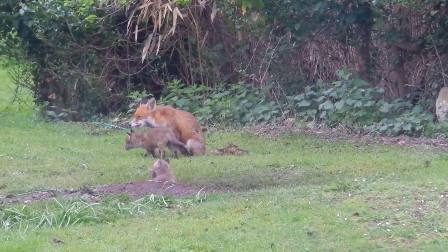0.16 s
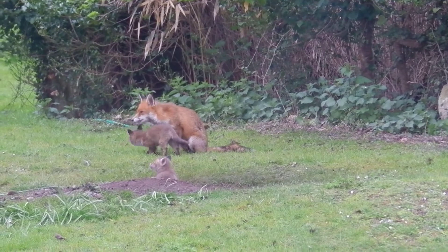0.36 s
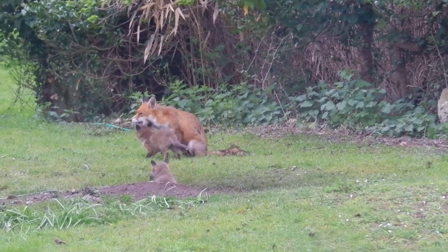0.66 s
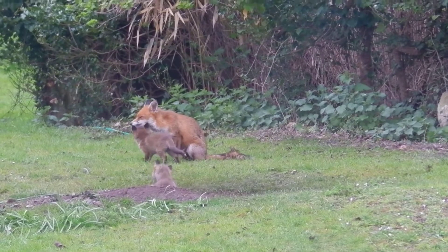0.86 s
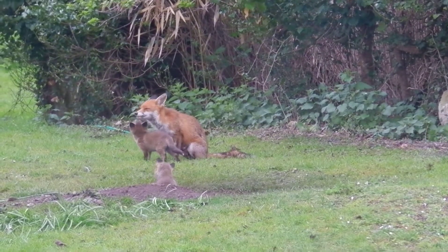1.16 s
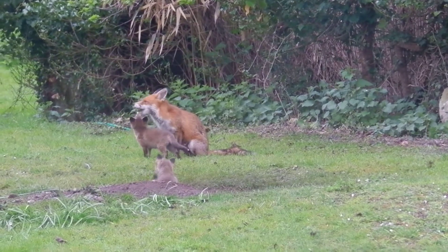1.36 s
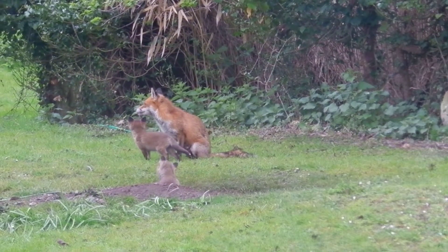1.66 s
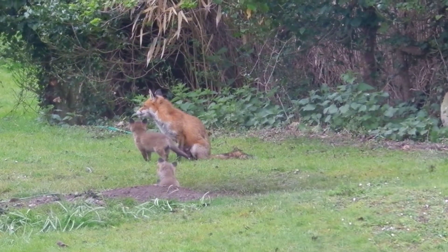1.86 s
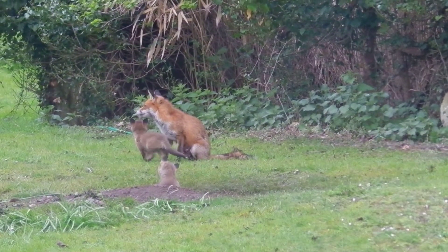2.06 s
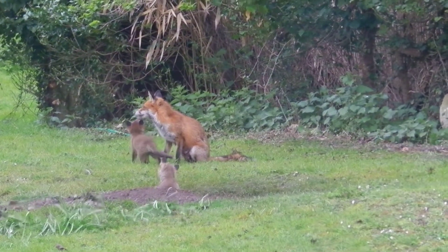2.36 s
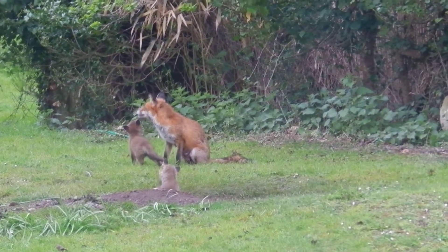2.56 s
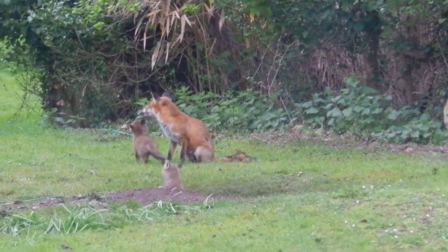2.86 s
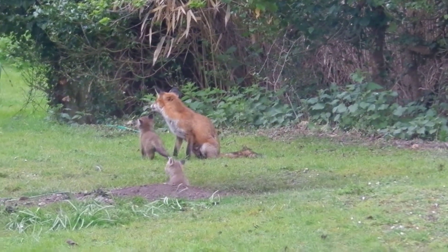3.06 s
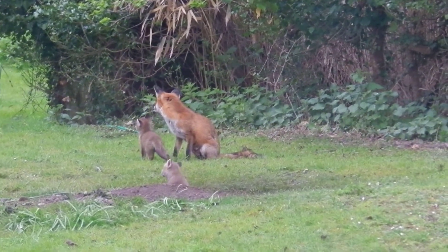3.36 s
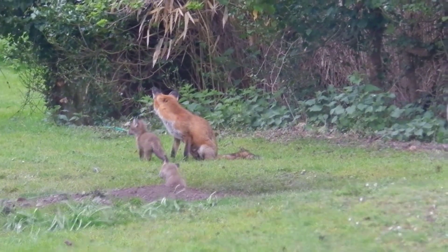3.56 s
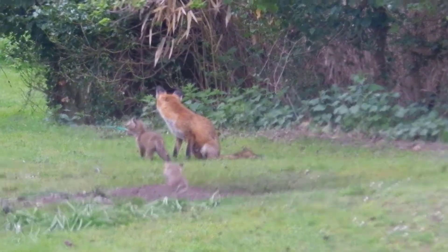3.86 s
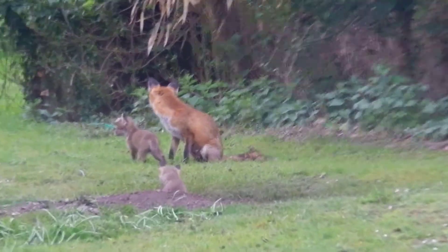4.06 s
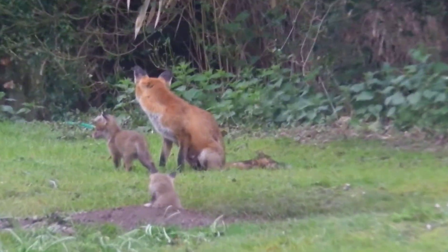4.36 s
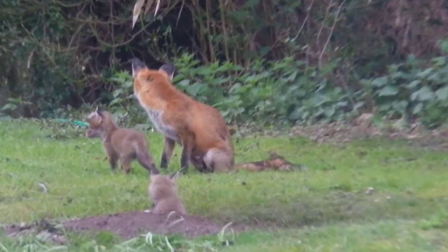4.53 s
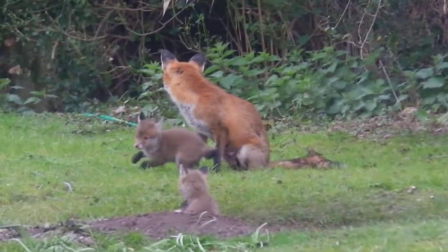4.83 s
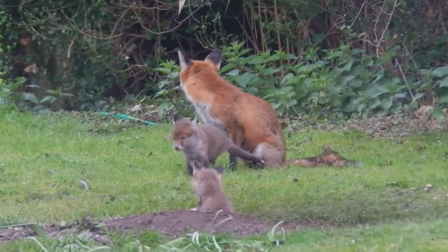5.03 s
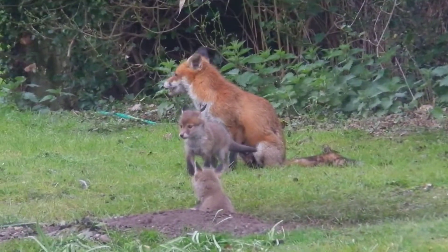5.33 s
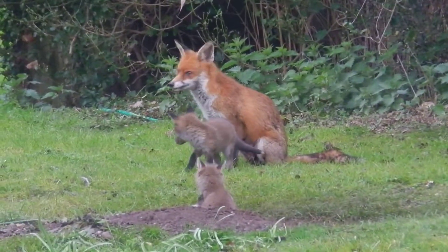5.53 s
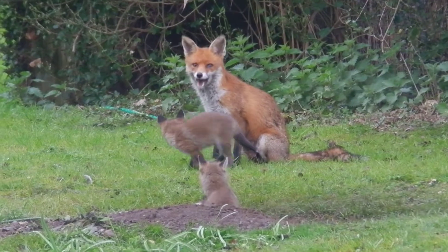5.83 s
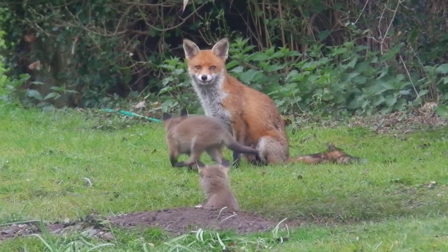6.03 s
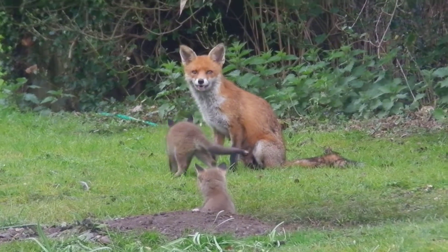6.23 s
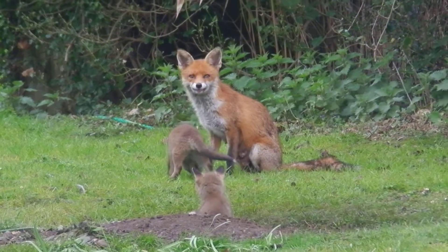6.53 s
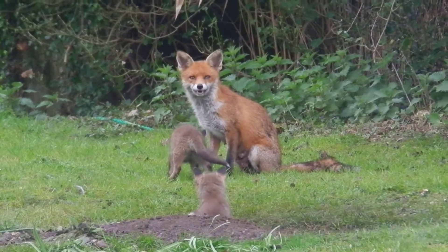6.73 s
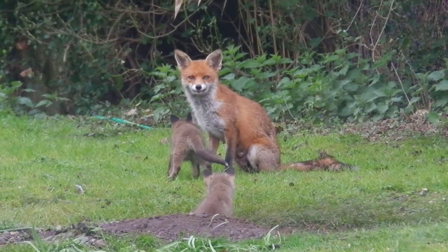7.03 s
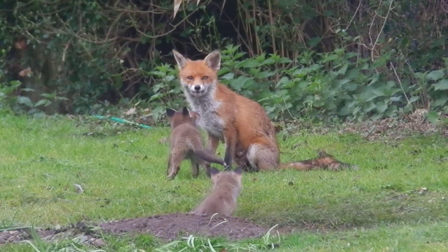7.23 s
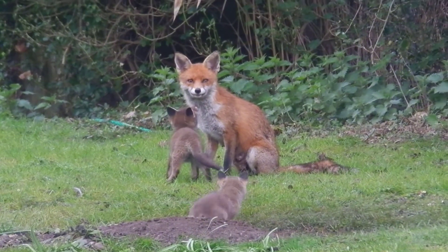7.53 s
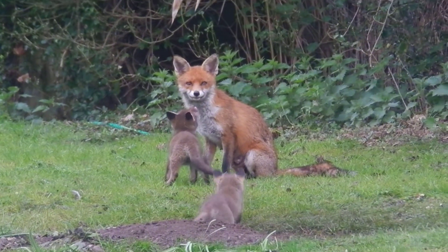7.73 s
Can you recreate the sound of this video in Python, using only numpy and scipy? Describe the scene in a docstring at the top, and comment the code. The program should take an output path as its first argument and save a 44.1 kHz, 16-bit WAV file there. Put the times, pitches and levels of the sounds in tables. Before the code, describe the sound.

Very close handling noise of a small camera in a quiet garden. Low rumble, soft hiss and a thin hum continue throughout. Faint finger rubs come first, then dull little motor bursts ten times a second, palm thuds and a hard knock. A brief whirring zoom with wavering chatter follows, starting near a sharp click, then another ticking train and near quiet. The foxes make no sound.

```python
"""Camcorder handling in a garden

A hand-held camcorder in a quiet garden hears mostly itself. The focus motor steps in bursts ten times a second
and shakes the resonant shell; the zoom gears whir for a moment as dense noise through the same shell, and a
loose part chatters in wavering tones. Fingers tick, thud and knock as decaying modes and slide as filtered
noise. Shaped noise makes the far rumble and microphone hiss, sines a thin hum and a faint falling bird chirp.
"""
import sys
import numpy as np
from scipy import signal
from scipy.fft import rfft, irfft
from scipy.io import wavfile
from scipy.ndimage import uniform_filter1d

SR = 44100
rng = np.random.default_rng(int(sys.argv[2]) if len(sys.argv) > 2 else 0)


def materialize(psi):
    """Save the field psi as 16-bit PCM at rate SR to the path in sys.argv[1].

    A 1-D psi becomes a single channel; in a 2-D psi each row is a channel.
    """
    bounded = np.clip(np.atleast_2d(psi).T, -1, 1)
    quanta = np.round(bounded * 32767).astype(np.int16)
    wavfile.write(sys.argv[1], SR, quanta)


N = 347831
T = np.arange(N) / SR  # time [s]
BLOW_T = T[:SR // 3]  # time within one touch [s]
OPPOSED = np.array([[1], [-1]])  # left and right capsule in opposite phase

# finger ticks: (time [s], peak [dB], crack against knock [dB], left minus right [dB], rattle against peak [dB])
TICK_EVENTS = [(0.281, -41, -24, 2, -16), (0.668, -39.5, 0, 4, -17), (0.69, -53, 17.5, 7, -18),
               (2.159, -29.5, -21.5, -2.5, -11.5), (2.165, -37, -8.5, -6.5, -7),
               (2.187, -33.5, -17, 7, -12), (2.819, -46, 2, -2, -10), (2.964, -45, -9, -0.5, -12),
               (3.26, -45, -5, 4, 2), (3.278, -30.5, -32, 3, -8), (3.375, -40, -9, 2, -4),
               (3.489, -26, -17.5, 3.5, -8), (3.611, -31.5, -22.5, -5, -8.5),
               (3.652, -38.5, -19, -1.5, -20), (3.723, -26.5, -21.5, -2.5, -14.5),
               (3.743, -40, -26, 0, -34), (4.18, -15, -7.5, 5, -17), (5.949, -47.5, -6, 1, -3),
               (6.778, -46.5, -10, 4, -12)]


def undb(db):
    """Gain of a level in dB."""
    return 10 ** (np.asarray(db, float) / 20)


def level(x, db):
    """Scale to an rms level in dB."""
    return x * undb(db) / np.sqrt(np.mean(x ** 2))


def noise():
    """White noise over the whole scene."""
    return rng.standard_normal(N)


def pan(db):
    """Gains of the two channels for a left-minus-right level in dB."""
    return undb(np.array([[db], [-db]]) / 2)


def band(x, hz, width):
    """Resonance with gain 1 at its centre."""
    return signal.lfilter(*signal.iirpeak(hz, hz / width, fs=SR), x)


def colour(x, points):
    """Shape the spectrum by (Hz, dB) points, joined along log frequency."""
    hz, db = np.transpose(points)
    f = np.maximum(np.arange(N // 2 + 1) * SR / N, 1)
    return irfft(rfft(x) * undb(np.interp(np.log(f), np.log(hz), db)), N)


def walk(rate):
    """Smooth random curve of rms 1, with `rate` new values a second."""
    hold = int(SR / rate)
    steps = np.repeat(rng.standard_normal(N // hold + 1), hold)
    smooth = uniform_filter1d(uniform_filter1d(steps, hold), hold)
    return level(smooth[:N], 0)


def ring(modes, rise_s):
    """One blow on a set of (Hz, dB, t60 s) modes that die away exponentially, peak 1."""
    x = sum(undb(db) * np.sin(2 * np.pi * hz * BLOW_T) * 1000. ** (-BLOW_T / t60) for hz, db, t60 in modes)
    x = x * (1 - np.exp(-BLOW_T / rise_s))
    return x / np.abs(x).max()


def add(out, s, x):
    """Mix a sound in at s seconds."""
    i = int(s * SR)
    out[..., i:i + x.shape[-1]] += x[..., :N - i]


def shell(force, column):
    """The shell's steep modes in alternating phase, each panned its own way; about unit level for a white force."""
    # shell resonances: (frequency [Hz], width [Hz], focus level [dB], zoom level [dB], left minus right [dB])
    shell_modes = np.array([(209.2, 38, 3, 6, -19), (362, 257, -7, 0, -4), (504, 90, 3.5, 4, 0.5),
                            (575, 98, -0.5, 5.5, -2), (774, 93, 1, 7, 3), (933, 70, -5.5, 1, -7),
                            (1024, 66, 3, 1.5, 2), (1117.5, 61, -2.5, 9.5, 0.5), (1247, 120, -13, -13, -14),
                            (1470, 180, -17, -7, 17.5), (1870, 287, -22, 0, 1), (2179, 340, -21.5, 5.5, 8),
                            (2170, 136, -22, -5, 22.5), (2490, 220, -23.5, -23, -1),
                            (3560, 480, -46, -11.5, 2), (4430, 760, -51, -12, 13.5),
                            (6140, 390, -56, -9, 3), (6860, 980, -83, -19.5, -17),
                            (10700, 5400, -12, -22, -4), (13800, 3500, -39, -23.5, -16)])
    total = np.sqrt(np.sum(undb(2 * shell_modes[:, column]) * shell_modes[:, 1]) * np.pi / SR)
    ringing = []
    for k, row in enumerate(shell_modes):
        hz, width = row[:2]
        gain = (-1) ** k * undb(row[column]) / total
        steep = band(band(force, hz, width), hz, 3 * width)
        ringing.append(gain * pan(row[4]) * steep)
    return ringing


def motor_force():
    """Focus bursts are uneven motor steps with gear rattle between them; the barrel's jolts are dull swells."""
    # focus hunts: (first burst [s], bursts as (level [dB], length [s]))
    hunts = [(1.477, [(-40.5, 0.02), (-42.5, 0.021), (-41.5, 0.028), (-42, 0.031), (-47.5, .019),
             (-44, .026), (-42, .012)]), (2.677, [(-39, 0.023), (-44, .033), (-43, 0.035), (-46, .03),
             (-40, .028), (-42, .014)]), (3.377, [(-42, 0.012), (-44, 0.01), (-53, .012)]),
             (3.779, [(-37, 0.028)]), (5.213, [(-41.5, .021), (-41.5, 0.027), (-41, 0.018), (-42.5, 0.026),
             (-43.5, .022), (-41, .034)])]
    # jolts as the zoom barrel starts and stops: (time [s], level [dB])
    barrel_jolts = [(3.852, -54.5), (4.688, -47)]
    period_s, step_hz = 0.1, 255  # between bursts, and mean rate of the steps
    rattle_db, rise_s, tail_s = -5.5, 0.0077, 0.029  # gear rattle against the steps
    jolt_s = 0.0073  # from onset to peak

    force, rattle = np.zeros(N), noise()
    bursts = [(first + k * period_s, db, length)
              for first, hunt in hunts for k, (db, length) in enumerate(hunt)]
    draws = rng.standard_normal((len(bursts), 2, 24))
    for (s, db, length), (slip, size) in zip(bursts, draws):
        steps = np.cumsum(np.abs(1 + 0.2494 * slip)) / step_hz - 1 / step_hz
        on = steps < length
        impulse = undb(db + 1.75 * size[on]) * np.sign(slip[on]) * np.sqrt(SR / step_hz)
        force[((s + steps[on]) * SR).astype(int)] += impulse
        shape = np.interp(T, [s - rise_s, s, s + length, s + length + tail_s], [0, 1, 1, 0])
        force += undb(db + rattle_db) * rattle * shape

    dull = level(band(band(noise(), 710, 650), 690, 1100), 0)
    for s, db in barrel_jolts:
        late = np.maximum(T - s, 0) / jolt_s
        force += undb(db) * dull * late * np.exp(1 - late)
    return force


def loose_force():
    """Each tick shakes loose parts, whose spiky noise dies away over a 24 ms time constant."""
    shaken = np.zeros(N)
    for s, peak_db, _, _, rattle_db in TICK_EVENTS:
        shaken += undb(peak_db + rattle_db) * (T > s) * np.exp(-np.abs(T - s) / 0.024)
    contacts = noise() * undb(2.5 * rng.exponential(size=N))
    return shaken * level(contacts, 0)


def rattles():
    """Motor steps and loose parts push softly on the lower shell modes, each capsule by its own path."""
    loose = loose_force()
    force = motor_force() + loose
    body = sum(shell(force, 2)[:15])
    apart = undb(0.5) * band(np.roll(force, 90), 250, 400)  # about 2 ms later
    bright = undb(-5.5) * band(band(loose, 2030, 1400), 2400, 6000)
    return body + apart * OPPOSED + bright


def zoom():
    """Dense tooth contacts shake the shell; some modes throb per turn and motor pole, louder under load."""
    # what differs between the capsules: (frequency [Hz], level [dB per Hz])
    side_spectrum = [(59, -49), (100, -16), (140, -26), (275, -13), (319, -14), (447, -22), (1460, -27.5),
                     (2370, -21), (2810, -28), (6260, -30), (15500, -39)]
    start_s, stop_s, spin_up_s, run_down_s, coast_s = 3.825, 4.638, 0.025, 0.046, 0.12
    engage_s, engage_rise_s = 3.9, 0.022  # the gears take up the lens
    idle_db, drive_db, idle_low_db = -45.5, -41.5, -4  # before and after; extra on the low modes before
    whine_start_db, whine_end_db = -4, 3
    shaft_hz, poles, speed_drift = 40.6, 6, 0.0039  # drift as a fraction of the speed
    shaft_depth, pole_depth = 0.16, 0.29

    on = np.interp(T, [start_s, start_s + spin_up_s, stop_s, stop_s + run_down_s], [0, 1, 1, 0])
    # the barrel runs out a little longer
    coast = np.interp(T, [start_s, start_s + spin_up_s, stop_s, stop_s + coast_s], [0, 1, 1, 0])
    engaged = np.interp(T, [engage_s, engage_s + engage_rise_s], [0, 1])
    turn = 2 * np.pi * np.cumsum(shaft_hz * (1 + speed_drift * walk(4))) / SR
    throb = (1 + shaft_depth * np.sin(turn)) * (1 + pole_depth * np.sin(poles * turn))

    contacts = level(noise() * undb(1.7 * rng.exponential(size=N)), 0)
    modes = shell(contacts, 3)
    whine_gain = undb(np.interp(T, [start_s, stop_s], [whine_start_db, whine_end_db]))
    whine = whine_gain * modes.pop(16)  # the 6140 Hz mode grows with the travel
    low = coast * undb(idle_low_db * (1 - engaged)) * sum(modes[:10])
    upper = on * (throb * sum(modes[10:14]) + sum(modes[14:]) + whine)
    apart = on * level(colour(noise(), side_spectrum), -8.0) * OPPOSED
    return undb(idle_db + (drive_db - idle_db) * engaged) * (low + upper + apart)


def chatter():
    """A loose part's wavering low tones with two overtones, louder on the right, jump as the lens travels."""
    # chatter tones: (time [s], length [s], first pitch [Hz], last pitch [Hz], shared level [dB],
    # level opposed between capsules [dB], unsteadiness [0-1])
    tones = [(3.94, 0.045, 165.4, 180, -46, -57, 1), (3.976, 0.147, 213.7, 222.5, -51, -54, 0.77),
             (4.114, 0.25, 233.7, 241, -55.5, -60, 1), (4.22, 0.16, 305, 337.6, -55.5, -47, 0.44),
             (4.361, 0.154, 350, 372, -49.5, -55, 0.71), (4.513, 0.026, 251, 245, -41, -47, 0.42),
             (4.552, 0.13, 317, 321.4, -46, -39.5, 0.08)]
    waver_depth, flutter_db = 0.0179, 3.5  # pitch fraction and level spread at full unsteadiness
    out, waver, flutter = np.zeros((2, N)), walk(60), walk(50)
    for s, length, first_hz, last_hz, shared_db, opposed_db, shake in tones:
        glide = np.interp(T, [s, s + length], [first_hz, last_hz])
        phase = 2 * np.pi * np.cumsum(glide * (1 + waver_depth * shake * waver)) / SR
        shared = np.sin(phase) + undb(-10.5) * np.sin(2 * phase) + undb(-8) * np.sin(3 * phase)
        opposed = np.sin(phase + 0.93) * -OPPOSED
        shape = np.interp(T, [s - .008, s + 0.0069, s + length - .008, s + length + .008], [0, 1, 1, 0])
        shape = shape * undb(flutter_db * shake * flutter)
        out += np.sqrt(2) * shape * (undb(shared_db) * shared + undb(opposed_db) * opposed)
    return out


def ticks():
    """A fingertip rings the shell briefly under a noisy crack; a touch with little crack starves the upper modes."""
    # modes of a tick: (frequency [Hz], level [dB], t60 [s])
    tick_modes = [(552, -8, 0.027), (775, 3.5, 0.022), (970, -6.5, 0.03), (1474, 0, 0.02),
                  (2120, 2.5, 0.009), (2510, 7, 0.0075)]
    firm_db, crack_s = -12, 0.002  # crack level below which a touch is soft; time to the crack's peak
    out = np.zeros((2, N))
    shifts = rng.standard_normal((len(TICK_EVENTS), len(tick_modes)))
    for (s, db, crack_db, pan_db, _), shift in zip(TICK_EVENTS, shifts):
        tilt_db = min(crack_db - firm_db, 0)  # per octave above 800 Hz
        struck = [(hz * (1 + 0.063 * u), gain_db + tilt_db * max(np.log2(hz / 800), 0), t60)
                  for (hz, gain_db, t60), u in zip(tick_modes, shift)]
        knock = ring(struck, 0.0015)
        hiss = band(band(rng.standard_normal((2, len(BLOW_T))), 4200, 3200), 6900, 5300)
        crack = hiss * BLOW_T / crack_s * np.exp(1 - BLOW_T / crack_s)
        add(out, s, undb(db) * pan(pan_db) * (knock + undb(crack_db) * crack))
    return out


def thuds():
    """Soft thuds of the palm ring two slow-rising low modes."""
    # thuds: (time [s], peak before the bass cut [dB], pitch factor)
    palm_thuds = [(2.168, -32.5, 1.02), (2.19, -32.5, 0.89), (2.405, -38, 0.93), (2.446, -44, 1.13),
                  (2.596, -32, 0.89), (3.278, -27.5, 1.14), (3.3, -32.5, 0.94), (3.321, -31, 1.05),
                  (3.928, -39.5, 0.95), (6.968, -38, 0.95)]
    # modes of a thud: (frequency before the pitch factor [Hz], level [dB], t60 [s])
    dull_modes = [(78.6, 2, 0.14), (111, 2, 0.09)]
    out = np.zeros(N)
    for s, db, pitch in palm_thuds:
        add(out, s, undb(db) * ring([(hz * pitch, gain_db, t60) for hz, gain_db, t60 in dull_modes], 0.016))
    return out


def knocks():
    """Hard knocks of the knuckle ring higher modes with a quick rise."""
    # knocks: (time [s], peak before the bass cut [dB])
    knuckle_knocks = [(2.187, -29), (3.278, -15.5), (3.299, -33), (3.322, -32)]
    # modes of a knock: (frequency [Hz], level [dB], t60 [s])
    hard_modes = [(184, -11, 0.245), (270, 12, 0.028), (330, 1.5, 0.051), (484, -4, 0.044),
                  (573, -11.5, 0.048)]
    out = np.zeros(N)
    for s, db in knuckle_knocks:
        add(out, s, -undb(db) * ring(hard_modes, 0.0035))
    return out


def slides():
    """Skin sliding on the shell: flickering noise through treble resonances, in short swells."""
    # slides: (time [s], level [dB], length [s])
    skin_slides = [(.5, -67, 0.03), (0.628, -56, 0.097), (0.875, -59.5, 0.051), (6.394, -52.5, 0.105),
                   (6.782, -60.5, 0.08)]
    # resonances under the skin: (frequency [Hz], width [Hz], level [dB])
    slide_bands = [(4110, 320, 6), (5670, 2300, 0), (6800, 510, -5), (9600, 1300, -7), (11900, 3000, -17)]
    skew = .8  # under 1: a slide swells faster than it fades
    rub = (.7 * noise() + rng.standard_normal((2, N))) * undb(1.2 * walk(80))  # partly shared noise
    rub = level(sum(undb(db) * band(rub, hz, width) for hz, width, db in slide_bands), 0)
    out = np.zeros((2, N))
    for s, db, length in skin_slides:
        progress = np.clip((T - s) / length, 0, 1)
        out += undb(db) * rub * np.sin(np.pi * progress ** skew) ** 1.4
    return out


def fingers():
    """Ticks, thuds and knocks come through the grip, losing the deepest bass in the microphone; slides hiss."""
    bass_cut = signal.butter(3, 60, "high", fs=SR, output="sos")
    return signal.sosfilt(bass_cut, ticks() + thuds() + knocks()) + slides()


def bird():
    """One faint falling chirp far off: a gliding sine in a half-sine swell."""
    start_s, length_s, start_hz, fall_hz, peak_db = .238, .02, 2430, 200, -64
    u = np.clip((T - start_s) / length_s, 0, 1)
    phase = 2 * np.pi * np.cumsum(start_hz - fall_hz * u) / SR
    return undb(peak_db) * np.sin(np.pi * u) * np.sin(phase)


def garden():
    """Far rumble that swells, smooth microphone hiss that is wider in the treble, and one thin steady hum."""
    # spectra of what the capsules share and what opposes them: (frequency [Hz], relative level [dB per Hz])
    mid_spectrum = [(15, -43), (25, -34.5), (64, -3), (113, -3.5), (144, -8.5), (184, -9), (241, -17.5),
                    (403, -16.5), (437, -18), (473, -21.5), (834, -22.5), (1090, -24.5), (2590, -38),
                    (5090, -38), (15800, -43)]
    side_spectrum = [(15, -52), (25, -29), (37, -9), (55, -20), (86, -0.5), (170, -5), (255, -7.5),
                     (425, -10), (587, -15), (637, -12), (2810, -25.5), (10800, -29.5), (15800, -33.5)]
    # far rumble, of which only the rise and fall about the median is used: (time [s], level [dB])
    rumble_curve = [(0.0, -63), (0.31, -57), (1.65, -56), (2.24, -52), (2.66, -56.5), (3.6, -54),
                    (4.02, -54), (5.18, -56.5), (7.69, -54), (7.89, -58)]
    mid_db, side_db, hum_hz, hum_db = -50.5, -54, 436, -63

    mid = level(colour(noise(), mid_spectrum), mid_db)
    side = level(colour(noise(), side_spectrum), side_db)
    air = mid + side * OPPOSED
    low = signal.sosfiltfilt(signal.butter(2, 140, fs=SR, output="sos"), air)
    s, db = np.transpose(rumble_curve)
    swell = undb(np.interp(T, s, db - np.median(db)) + 3.1 * walk(6.6))
    phase = 2 * np.pi * np.cumsum(hum_hz * (1 + 0.00061 * walk(1.99))) / SR
    hum = np.sin(phase) * np.sqrt(2) * undb(hum_db + 1.5 * walk(3.38))
    return air - low + low * swell + hum


def scene():
    """Everything at the two capsules."""
    return rattles() + zoom() + chatter() + fingers() + bird() + garden()


def record(dry):
    """The recorder cuts the top steeply above 15.79 kHz."""
    return signal.sosfilt(signal.ellip(13, .3, 75, 15790, fs=SR, output="sos"), dry)


dry = scene()
out = record(dry)
materialize(out)
```